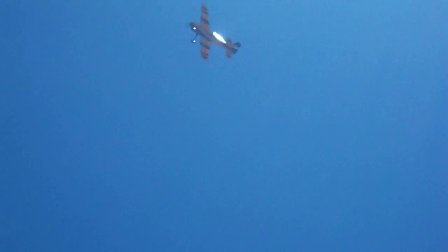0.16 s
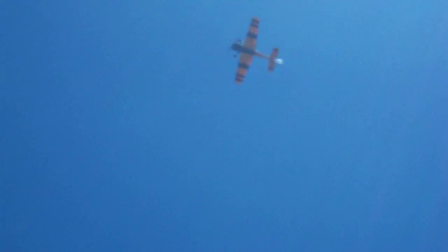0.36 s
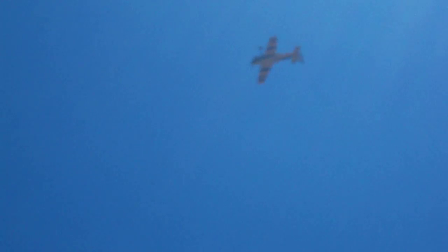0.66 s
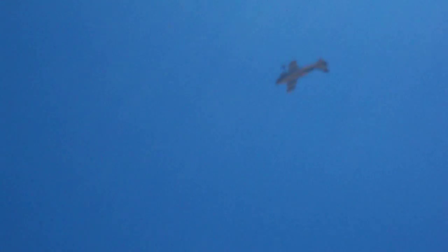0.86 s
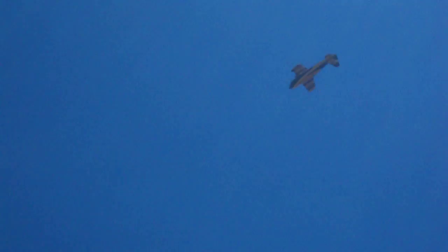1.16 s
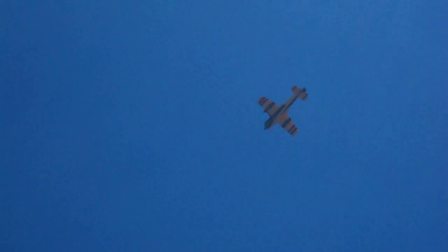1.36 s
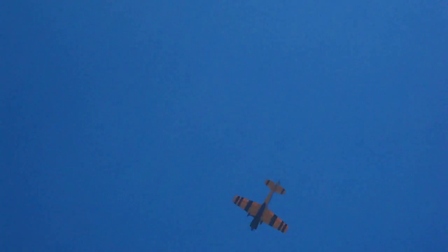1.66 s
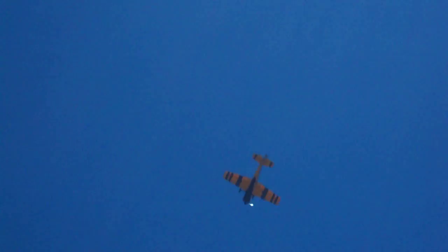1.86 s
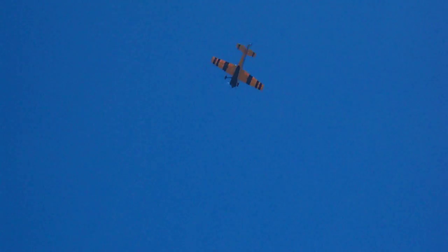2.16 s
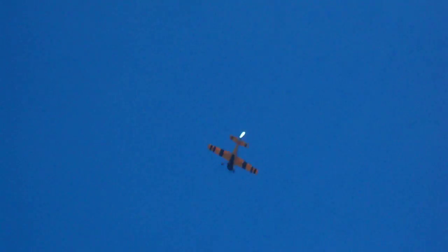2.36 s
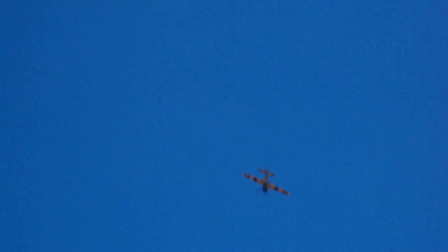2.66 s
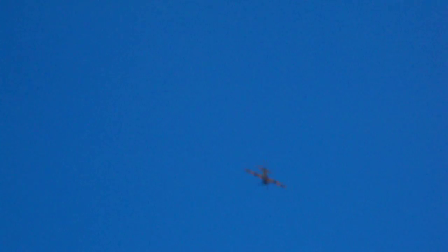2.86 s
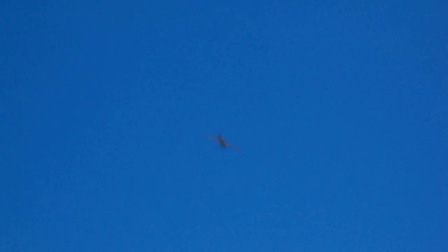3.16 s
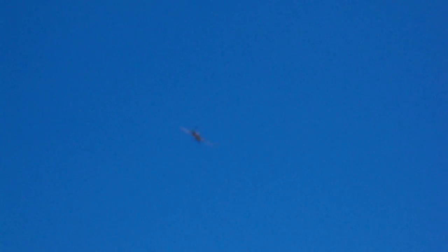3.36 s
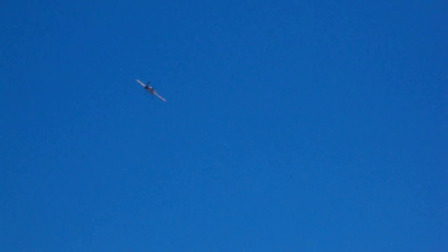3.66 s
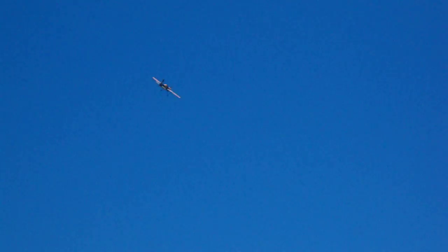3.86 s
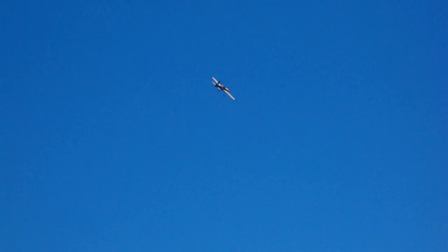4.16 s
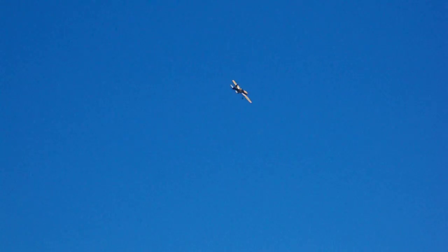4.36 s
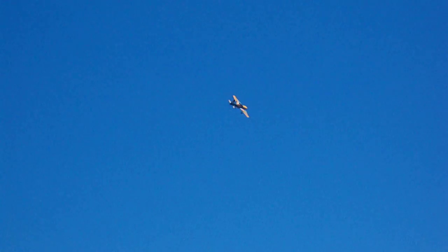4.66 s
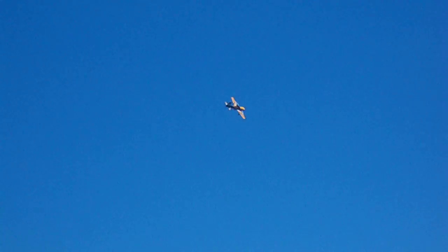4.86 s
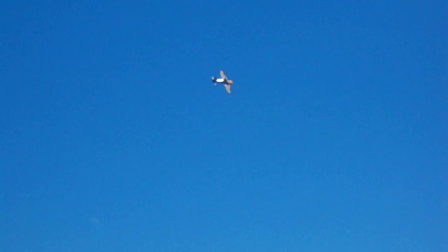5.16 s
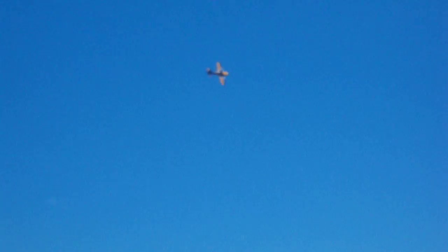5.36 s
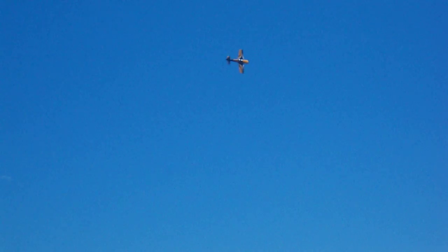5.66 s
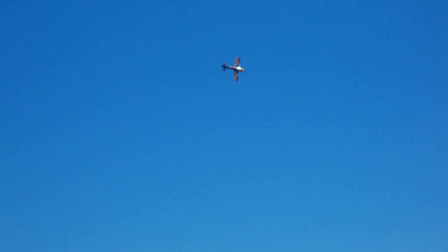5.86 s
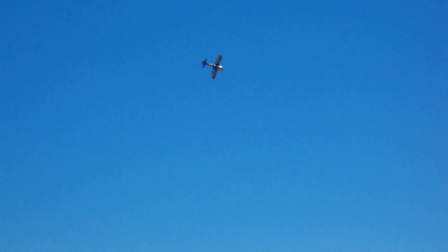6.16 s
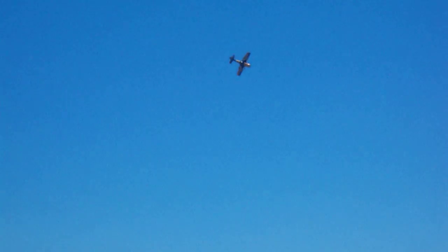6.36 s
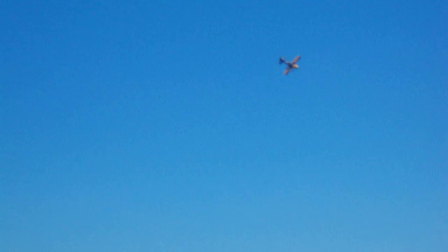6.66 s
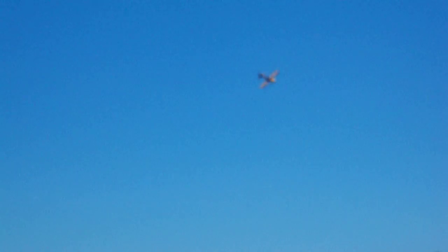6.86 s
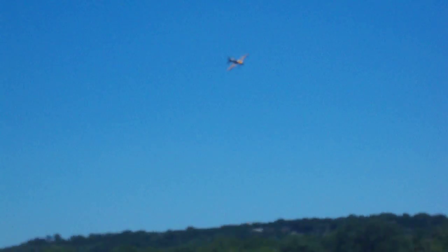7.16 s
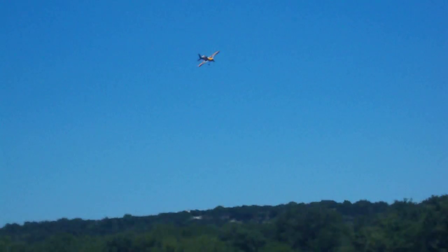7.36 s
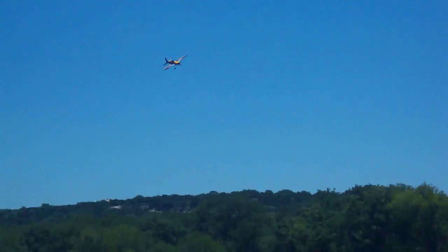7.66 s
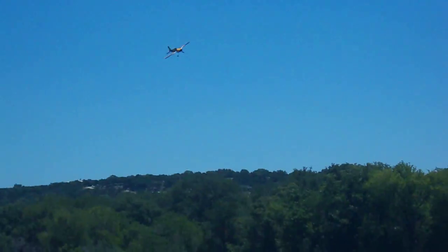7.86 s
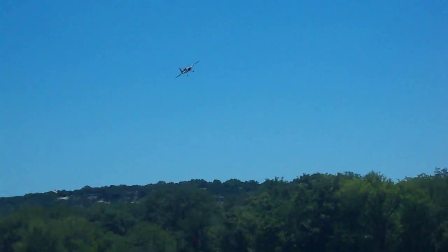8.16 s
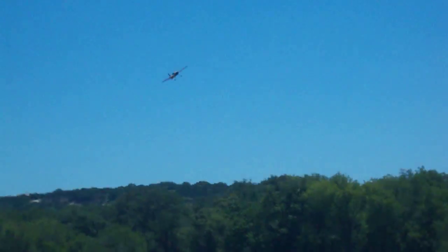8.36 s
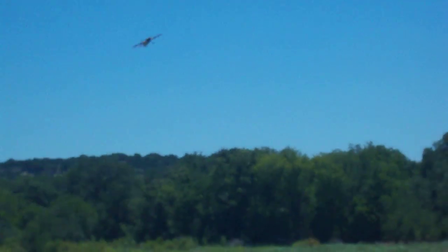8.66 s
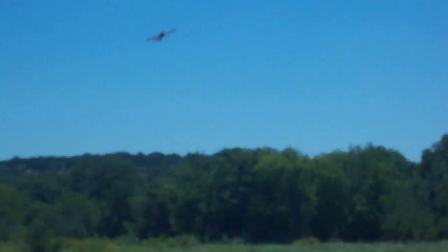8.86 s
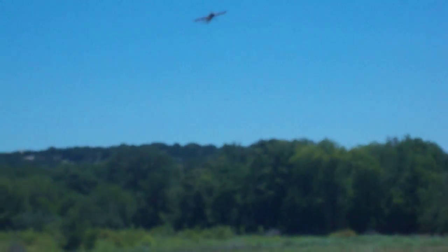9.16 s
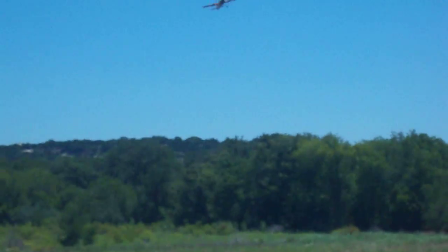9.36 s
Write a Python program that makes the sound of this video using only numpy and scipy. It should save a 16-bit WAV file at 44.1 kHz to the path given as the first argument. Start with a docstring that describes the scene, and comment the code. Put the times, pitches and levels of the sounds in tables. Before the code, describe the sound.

Outdoors, a small two-stroke model plane passes overhead. A very short snarl opens, a few loose pops follow, then a longer burst climbs to a buzzing whine. At about 2.3 seconds the throttle shuts with a faint breathy note, and the engine putters irregularly at idle, growing fainter, then nearer again. Air rushes over the plane, and wind rumbles and buffets the microphone.

```python
"""Two snarling bursts of throttle open the scene: a model plane's two-stroke engine, firing on every turn.
Then it glides at idle, mostly firing every second or third turn: each firing is a pulse that rings the silencer.
The propeller hums on multiples of the shaft speed, and air tears past it as shaped noise.
Grass returns a later, duller copy whose lag mostly shrinks as the plane sinks.
Wind rumbles, pushes and flutters at the microphone, and a few short bright ticks are heard."""
import sys
import numpy as np
from scipy import signal
from scipy.fft import rfft, irfft, next_fast_len
from scipy.io import wavfile
from scipy.ndimage import uniform_filter1d, map_coordinates

SR = 44100
rng = np.random.default_rng(int(sys.argv[2]) if len(sys.argv) > 2 else 0)


def file_out(sig):
    """Save sig as 16-bit WAV at sys.argv[1]."""
    # one column per channel
    cols = np.atleast_2d(sig).T
    # limit, then scale
    lim = np.clip(cols, -1, 1)
    pcm = np.round(lim * 32767).astype(np.int16)
    wavfile.write(sys.argv[1], SR, pcm)


N = 418950

# open throttle, one list per burst: start_s, shaft_hz, firing_db, crack_db (relative to the firing)
POWER_BURSTS = [
    [(0.0, 74.8, -24, 2.5), (0.084, 84.6, -26.5, -1.5), (0.144, 91.1, -22.5, 1), (0.26, 95.2, -27, -18),
     (0.296, 96, -24.5, -37), (0.315, 94.6, -31.5, -27)],
    [(0.721, 55.47, -26.5, 4.5), (0.809, 67.1, -27, -4), (0.845, 71.6, -26.5, -6.5),
     (0.879, 75.16, -25.5, 0.5), (0.937, 79.5, -25, -13), (0.999, 83.9, -29, -1), (1.057, 86, -31, -14),
     (1.131, 88.8, -24.5, 2), (1.411, 89.9, -25, -1), (1.615, 96.13, -24, 1.5), (1.729, 97.3, -26, -2.5),
     (2.005, 98.14, -27, 1), (2.231, 97.6, -29.5, -5.5), (2.312, 95.5, -25.5, -9)],
]
# single firings at idle: start_s, level_db
SINGLE_FIRINGS = [(0.325, -13), (0.357, -12), (0.598, -7), (0.653, -11), (0.709, -9), (2.336, -14),
                  (2.669, -10), (2.788, -16.5), (2.986, -20), (3.105, -21), (3.202, -25.5), (3.257, -22.5),
                  (3.303, -18.5), (3.377, -17), (3.447, -19), (3.519, -22), (3.564, -19.5), (3.634, -20.5),
                  (3.707, -19.5), (3.775, -18.5), (3.846, -23.5), (3.893, -17.5), (3.961, -20),
                  (4.029, -20.5), (4.142, -19.5), (4.188, -25), (4.234, -21.5), (4.3, -23.5), (4.348, -20),
                  (4.39, -25.5), (4.435, -21), (4.481, -27), (4.523, -23.5), (4.568, -24.5), (4.637, -24),
                  (4.722, -26), (4.784, -27), (4.829, -28.5), (4.896, -30.5), (4.957, -24.5), (5.046, -25),
                  (5.134, -25.5), (5.2, -27), (5.265, -25), (5.33, -25.5), (5.396, -31), (5.463, -27),
                  (5.532, -27.5), (5.599, -29.5), (5.688, -33.5), (5.887, -27.5), (5.965, -30),
                  (6.036, -31.5), (6.138, -28.5), (6.24, -28), (6.316, -25), (6.388, -26), (6.457, -24),
                  (6.524, -23.5), (6.593, -23.5), (6.661, -24), (6.707, -25), (6.752, -23), (6.843, -22.5),
                  (6.91, -23), (6.977, -22), (7.065, -22), (7.129, -21), (7.192, -24), (7.234, -20.5),
                  (7.297, -22), (7.342, -24), (7.386, -21.5), (7.452, -19), (7.493, -23), (7.537, -17),
                  (7.601, -23), (7.648, -21), (7.693, -23.5), (7.741, -18), (7.807, -19), (7.875, -20.5),
                  (7.922, -19), (7.967, -25), (8.012, -19.5), (8.099, -20), (8.166, -17), (8.229, -17.5),
                  (8.292, -19.5), (8.354, -18), (8.421, -17), (8.487, -19), (8.549, -18), (8.615, -19.5),
                  (8.682, -18), (8.747, -17), (8.813, -17), (8.859, -25.5), (8.88, -18), (8.945, -17.5),
                  (8.991, -26.5), (9.011, -18), (9.081, -16.5), (9.145, -17), (9.209, -16), (9.271, -15.5),
                  (9.335, -14.5), (9.376, -21.5), (9.42, -14.5), (9.483, -15.5)]
# shaft speed with the throttle closed: start_s, shaft_hz
IDLE_SPEED = [(.3, 42.32), (3.2, 40.2), (3.5, 42.4), (4.5, 45), (5.3, 44.2), (5.9, 42.26), (6.5, 46.04),
              (7.8, 44.5), (8.3, 47.2), (9, 47.8), (9.5, 45.3)]
# mix of the firing colour heard with the exhaust turned aside: start_s, share (0-1)
ASIDE_SHARE = [(.3, 0.75), (.75, 0.92), (1.1, 0.54), (1.4, 0.7), (1.65, 0.47), (2.3, 0.09)]
# boom and bark of a single firing, relative to its level: start_s, boom_db, bark_db
FIRING_BODY = [(.3, -8, -1), (.7, -14, -0.5), (2.4, -6, -1), (3.5, 2, -13), (5.5, 9, -23.5), (6.5, 3.5, -9),
               (7.8, -4, -10.5), (8.8, 2, -1), (9.5, 1, -3.5)]
# crack of a single firing, duller while the plane is far: start_s, crack_db
CRACK_BRIGHTNESS = [(.3, -15), (.6, -6.5), (2.8, -13), (3.3, -9.5), (5, -9), (5.6, -13.5), (6.6, -22),
                    (7.2, -8.5), (7.9, -9.5), (8.5, -12), (9.5, -8.5)]
# notes of the air in the silencer: pitch_hz, level_db, fade_s (time to fall 60 dB)
CHAMBER_NOTES = [(280.5, -2, 0.07), (359, -4.5, 0.047)]
# notes of the silencer walls: pitch_hz, level_db, fade_s (time to fall 60 dB)
WALL_NOTES = [(1797, -6, 0.031), (2555, -7, 0.032), (3460, -14, 0.013), (4870, -21, 0.049),
              (5650, -17, 0.05)]
# motion shifts both sets of silencer notes: start_s, pitch_factor
MOTION_PITCH = [(0, 0.82), (3.5, .93), (6.8, 0.94), (7.5, 0.99), (8.3, 1.0), (9.5, 0.99)]
# level change from the plane's distance and heading: start_s, level_db
NEARNESS = [(0, 9), (.25, 2), (.5, -0.5), (.85, -1.5), (1.2, 3.5), (1.7, 1.5), (2.2, 0), (2.4, -4),
            (2.7, -2.5), (3.15, -5), (3.9, -1), (4.6, -8.5), (5.2, -7), (5.8, -11.5), (6.4, -10.5),
            (7, -6.5), (7.5, -6), (8.2, -5), (8.8, -5), (9.5, -3.5)]
# propeller hum, swelling and fading as the plane rolls: start_s, 2nd_db, 3rd_db, 4th_db, 5th_db
HUM_LEVELS = [(0, -30, -32.5, -39, -45), (.05, -34, -32, -40.5, -42), (.11, -28, -41, -38.5, -60),
              (.2, -29, -37, -56, -47), (.3, -27.5, -41, -45, -61), (.4, -37, -64, -34, -46),
              (.55, -46, -55, -40.5, -47), (.72, -42, -53, -37.5, -32.5), (.84, -50, -34, -44, -39),
              (.95, -56, -33.5, -54, -46), (1.05, -38, -52, -46, -33.5), (1.42, -45.5, -38.5, -51, -40),
              (1.641, -55, -50, -69, -60), (1.97, -49, -33.5, -49, -49), (2.25, -41.5, -35, -42, -42),
              (2.36, -31, -40, -38, -43.5), (2.45, -46, -54, -44, -52), (2.75, -49, -50, -38.5, -43),
              (3.2, -54, -41, -40, -43.5), (5.5, -55, -72, -54, -45.5), (9.5, -55, -70, -48, -45.5)]
# higher hum notes, relative to the 5th: shaft_multiple, level_db
HIGHER_HUM = [(6, -1.5), (7, 1), (8, -7)]
# level of the air hiss: start_s, level_db
HISS_LEVEL = [(0.0, -45), (0.37, -51), (0.61, -49), (0.79, -47.5), (1.48, -45.5), (2.14, -49), (2.3, -47.5),
              (4.15, -54), (4.52, -48), (6.38, -60), (7.49, -50.5), (8.65, -52), (9.21, -46.5), (9.5, -45)]
# breathy note as the throttle closes: start_s, level_db
WHISTLE_LEVEL = [(2.3, -77), (2.45, -51), (2.6, -45.5), (2.75, -74.5)]
# second copy close behind, shifting as the plane turns: start_s, delay_ms, level_db, phase_lag_turns
CLOSE_COPY = [(2.2, 2.2, -18, .5), (3.3, 2.35, -11, .5), (6.5, 2.25, -7, .45), (7.2, 1.88, -5, .48),
              (8, 1.44, -5, .47), (8.5, 1.5, -4, .16), (9.5, 1.5, -4, .16)]
# extra delay of the path over the grass: start_s, delay_ms
GRASS_DELAY = [(0, 8.77), (.8, 9.13), (1.6, 8.03), (2, 7.63), (2.4, 6.44), (2.8, 5.07), (3.4, 4.24),
               (4.2, 3.73), (5.4, 3.33), (7.2, 2.79), (9.5, 2.6)]
# level of the grass copy: start_s, level_db
GRASS_LEVEL = [(0, -4), (.8, -5), (1.3, -8.5), (1.6, -4.5), (2.1, -0.5), (2.8, -7.5), (3.4, -7.5),
               (6, -12.5), (9.5, -14)]
# steady wind at the microphone: start_s, level_db
STEADY_WIND = [(0.0, -36.5), (0.37, -32), (0.66, -24.5), (1.82, -31), (2.7, -18.5), (3.12, -25),
               (3.41, -18.5), (3.89, -25.5), (4.34, -16), (5.72, -32), (5.92, -28.5), (6.27, -35),
               (6.98, -28), (7.67, -27), (8.04, -32), (8.39, -26.5), (8.99, -32), (9.5, -33)]
# separate buffets: start_s (middle of the buffet), level_db, length_s
WIND_BUFFETS = [(0.513, -13.5, 0.057), (0.651, -7.5, 0.021), (0.81, -16.5, 0.011), (0.864, -16.5, 0.017),
                (0.955, -10.5, 0.019), (0.991, -16, 0.022), (2.557, -16, 0.049), (2.663, -10, 0.012),
                (2.844, -9.5, 0.007), (2.903, -7, 0.02), (2.951, -13, 0.0064), (3.046, -2.5, 0.018),
                (3.084, -7.5, 0.012), (3.228, -8.5, .007), (3.271, -9.5, 0.011), (3.432, -8, 0.02),
                (3.475, -13, 0.0033), (3.592, -11, 0.0165), (4.074, -7.5, 0.0095), (4.271, -3, 0.0083),
                (4.346, -7, 0.0038), (4.421, -14, 0.043), (4.547, -5, 0.034), (4.671, -18, 0.019),
                (4.805, -8, 0.023), (5.143, -15.5, 0.019), (5.416, -13.5, 0.019), (5.609, -10, 0.013),
                (7.279, -21, 0.022), (7.376, -12, 0.0064), (7.576, -10, 0.016), (8.389, -14, 0.019),
                (9.49, -13, 0.017)]
# dry ticks: start_s, level_db
TICK_TIMES = [(4.809, -36.5), (7.58, -43.5), (8.581, -38)]

# Colours: relative strength at each pitch; columns pitch_hz, level_db (per Hz).
# regular firing
BARK_COLOUR = [(60, -17), (190, -8.5), (290, -1), (390, -32), (480, -2.5), (700, -1), (1130, 4),
               (1400, -8.5), (2000, -5.5), (2350, -24.5), (2650, -5.5), (3200, -10), (4000, -19),
               (4500, -36), (5500, -23), (8000, -28.5), (9000, -59)]
# firing with the exhaust turned aside
ASIDE_COLOUR = [(60, -16.5), (190, -1), (290, 0), (390, -5.5), (480, 6.5), (700, 0.5), (800, 0),
                (1050, 1.5), (1200, -12), (1340, -2.5), (1600, -16.5), (2000, -10.5), (2350, -25.5),
                (2700, -15.5), (3500, -20), (4200, -28), (8000, -26), (9000, -54.5)]
# low thump of a single firing
THUMP_COLOUR = [(60, -26.5), (130, -7.5), (270, 8), (420, 0.5), (650, -3.5), (1050, -12.5), (1400, -24.5),
                (2000, -15), (3000, -28), (9000, -49)]
# sharp crack of a firing
CRACK_COLOUR = [(700, -28.5), (1500, -5.5), (2000, -0.5), (2400, 3.5), (3100, 0.5), (4000, -2), (5500, -4),
                (7300, -4.5), (8800, -37.5)]
# gas pushed out without fire
PUFF_COLOUR = [(80, -21.5), (180, -4), (280, 15), (390, -4.5), (600, -10), (1000, -19), (1700, -32.5),
               (3000, -30), (9000, -72)]
# air tearing past the plane
RUSH_COLOUR = [(150, -47), (300, -3), (450, 4), (700, 0.5), (1200, -3), (2000, -6.5), (3000, -12.5),
               (4200, -21.5), (9000, -56.5)]
# highest part of air and firings
HISS_COLOUR = [(2500, 5.5), (4000, 4), (5500, 3.5), (7300, 2), (8200, -6), (8900, -48.5)]
# deep wind rumble
RUMBLE_COLOUR = [(8, -37.5), (20, 0.5), (38, 3.5), (70, -2), (110, -11.5), (200, -24.5), (600, -85.5)]
# higher wind flutter
FLUTTER_COLOUR = [(50, -0.5), (100, -3), (170, -8), (280, -14.5), (400, -22), (1000, -71)]

IDLE_HZ = 42.2  # reference shaft speed
RUN_DOWN_S = .22  # time constant of the fall towards idle
PUFF_DB = -36
BLADE_TURNS = 0.2897  # where the blades stand when the port opens
RUSH_DB, RUSH_PER_OCTAVE_DB = -41.5, 5  # at the reference speed, and per doubling of it
EDDY_HZ, EDDY_S = 30.6, 0.028  # typical pitch of a push of this length; shorter is higher
FLUTTER_DB = -11  # relative to the wind
TOP_HZ = 8985


def amp(db):
    """Turn decibels into gain."""
    return 10 ** (np.asarray(db) / 20)


def unit(x):
    """Scale x to rms 1."""
    return x / np.sqrt(np.mean(x ** 2) + 1e-20)


def along(points, hz):
    """Read a colour's dB between its points on a log pitch axis."""
    f, db = np.transpose(points)
    return np.interp(np.log(hz + 1), np.log(f + 1), db)


def curves(rows):
    """Give one value per sample for each column after the time."""
    s, *columns = np.transpose(rows)
    return [np.interp(np.arange(N) / SR, s, column) for column in columns]


def wobble(rate):
    """Draw a smooth random curve with this many random points a second."""
    points = rng.standard_normal(int(N * rate / SR) + 4)
    return map_coordinates(points, [np.arange(N) * rate / SR])


def filtered(x, response):
    """Multiply the spectrum of x by a response of frequency."""
    size = next_fast_len(N + SR // 2)
    return irfft(rfft(x, size) * response(np.fft.rfftfreq(size, 1 / SR)), size)[:N]


def noise(colour):
    """Make coloured noise of rms 1."""
    return unit(filtered(rng.standard_normal(N), lambda hz: amp(along(colour, hz))))


def ring(x, colour, lead=0):
    """Give pulses a colour at energy 1; lead (turns) bends a push into a push and pull."""
    size = 2 ** 12
    # folding the cepstrum makes the response begin promptly
    cepstrum = irfft(np.log(amp(along(colour, np.fft.rfftfreq(size, 1 / SR)))))
    cepstrum[1:size // 2] *= 2
    cepstrum[size // 2 + 1:] = 0
    response = np.exp(rfft(cepstrum) + 2j * np.pi * lead)
    shape = np.roll(irfft(response), size // 2)
    return signal.fftconvolve(x, shape / np.linalg.norm(shape))[size // 2:][:N]


def spikes(s, db):
    """Place an impulse at each time, shared between the two nearest samples."""
    at = np.clip(s * SR, 0, N - 2)
    left = at.astype(int)
    share = at - left
    return np.bincount(left, amp(db) * (1 - share), N) + np.bincount(left + 1, amp(db) * share, N)


def bursts(s, db, t60):
    """Place a short dying burst of white noise at each time."""
    t = np.arange(SR // 20) / SR
    fall = amp(-60 * t / t60)
    envelope = signal.fftconvolve(spikes(s, db), fall / np.linalg.norm(fall))[:N]
    return envelope * rng.standard_normal(N)


def ringing(s, db, modes, scatter_db=4.5):
    """Each pulse rings the silencer's dying notes at new random strengths, shifted by motion."""
    t = np.arange(SR // 10) / SR
    hz, level_db, t60 = np.transpose(modes)[:, :, None, None]
    detune = 1 + .015 * rng.standard_normal((len(s), 1))
    shift = np.interp(s, *np.transpose(MOTION_PITCH))[:, None] * detune
    chance = rng.standard_normal((len(s), len(modes))).T[:, :, None]
    fading_db = level_db + db[:, None] + scatter_db * chance - 60 * t / t60
    notes = amp(fading_db) * np.sin(2 * np.pi * hz * shift * t)
    where = np.round(s * SR).astype(int)[:, None] + np.arange(len(t))
    return np.bincount(where.ravel(), notes.sum(axis=0).ravel(), N + SR)[:N]


def exhaust(angle):
    """The piston opens the exhaust port once a turn, with or without fire."""
    s = np.interp(np.arange(angle[-1]), angle, np.arange(N) / SR)
    powered = np.any([(s > burst[0][0] + .004) & (s < burst[-1][0]) for burst in POWER_BURSTS], axis=0)
    gap_s = np.abs(s[:, None] - np.transpose(SINGLE_FIRINGS)[0]).min(axis=1)
    unfired = ~powered & (gap_s > .006)
    return throttle(s[powered]) + pops() + puffs(s[unfired] + 0.00153)


def throttle(s):
    """Regular firings each push out a clean pulse, with a spit of noise from the gas jet."""
    chance = rng.standard_normal((len(s), 3))
    s = s + .0018 + 3e-6 * chance[:, 0]
    rows = POWER_BURSTS[0] + POWER_BURSTS[1]
    at, _, _, crack_db = np.transpose(rows)
    db = per_turn(s, rows) + .4 * chance[:, 1]
    spit_db = db + np.interp(s, at, crack_db) + chance[:, 2]
    jet = ring(bursts(s, spit_db - 16, t60=.006), CRACK_COLOUR)
    aside = np.clip(curves(ASIDE_SHARE)[0], 0, 1)
    train = spikes(s, db)
    facing = ring(train * (1 - aside), BARK_COLOUR, lead=1 / 5)
    turned = ring(train * aside, ASIDE_COLOUR, lead=1 / 5)
    return facing + turned + jet


def per_turn(s, rows):
    """Find one pulse's energy by sharing the level of the whole train among its turns."""
    at, hz, db = np.transpose(rows)[:3]
    return np.interp(s, at, db - 10 * np.log10(hz / SR))


def pops():
    """Single idle firings thump and ring the air in the silencer, then crack and ring its walls."""
    s, db = np.transpose(SINGLE_FIRINGS)
    s = s + .0022
    at, boom, bark = np.transpose(FIRING_BODY)
    boom_db = db + np.interp(s, at, boom)
    bark_db = db + np.interp(s, at, bark)
    push = spikes(s, (db + boom_db) / 2 + 17.0) + bursts(s, boom_db + 6.5, t60=0.048)
    thump = ring(push, THUMP_COLOUR)
    thump = thump + ringing(s, boom_db - 7.0, CHAMBER_NOTES, scatter_db=2.5)
    thump = thump + ring(spikes(s, bark_db + 14.0), ASIDE_COLOUR, lead=1 / 6)
    snap_db = db + np.interp(s, *np.transpose(CRACK_BRIGHTNESS))
    snap = spikes(s, snap_db + 14.0) + bursts(s, snap_db + 15.5, t60=0.01)
    crack = ring(snap, CRACK_COLOUR)
    body = filtered(thump + crack, lambda hz: 1 / (1 + (hz / 3800) ** 4))
    # the sizzle differs from firing to firing
    sizzle_db = snap_db + 5 + 3.5 * rng.standard_normal(len(s))
    sizzle = ring(bursts(s, sizzle_db, t60=.03), HISS_COLOUR)
    wall_db = snap_db + .5 * (boom_db - db) - 3.0
    return body + sizzle + ringing(s, wall_db, WALL_NOTES, scatter_db=3.5)


def puffs(s):
    """A turn without fire pushes a little gas through the silencer and unevenly ticks its walls."""
    db = PUFF_DB + np.interp(s, *np.transpose(NEARNESS)) + 10 * np.log10(SR / IDLE_HZ)
    db = db + 1.2 * rng.standard_normal(len(s))
    db = db + .5 * np.interp(s, *np.transpose(FIRING_BODY)[:2])  # fuller when the chamber booms
    gas = spikes(s, db - 1.5) + bursts(s, db - 10, t60=.045)
    chamber = ringing(s, db - 30.5, CHAMBER_NOTES, scatter_db=0.5)
    wall_db = db - 47.5 + 2.4 * rng.exponential(size=len(s))
    return ring(gas, PUFF_COLOUR) + chamber + ringing(s, wall_db, WALL_NOTES)


def shaft():
    """Add up the turns of the crankshaft, nudged so every single firing falls on a whole turn."""
    angle = np.cumsum(speed()) / SR
    t, fired = np.arange(N) / SR, np.transpose(SINGLE_FIRINGS)[0]
    at = np.interp(fired, t, angle)
    whole_turns = np.cumsum(np.maximum(np.round(np.diff(at, prepend=0)), 1))
    slip = whole_turns - at
    start, end = POWER_BURSTS[1][0][0], POWER_BURSTS[1][-1][0]
    held = np.where((t > start) & (t < end), start, t)  # hold the nudge through the second burst
    return angle + uniform_filter1d(np.interp(held, fired, slip), size=900)


def speed():
    """Shaft speed in Hz follows the open throttle, then sinks to idle after it shuts."""
    t = np.arange(N) / SR
    idle = hz = curves(IDLE_SPEED)[0]
    for burst in POWER_BURSTS:
        s, driven = np.transpose(burst)[:2]
        fall = np.exp(-np.maximum(t - s[-1], 0) / RUN_DOWN_S)
        falling = idle + (driven[-1] - idle) * fall
        after_start = np.where(t < s[-1], np.interp(t, s, driven), falling)
        hz = np.where(t < s[0], hz, after_start)
    return hz


def propeller(angle):
    """The blades hum as sine waves on multiples of the shaft speed."""
    levels = list(zip((2, 3, 4, 5), curves(HUM_LEVELS)))
    fifth_db = levels[-1][1]
    levels += [(k, fifth_db + db - 3 * np.log2(speed() / IDLE_HZ)) for k, db in HIGHER_HUM]
    turned = 2 * np.pi * (angle - BLADE_TURNS)
    return np.sqrt(2) * sum(amp(db + 1.1 * wobble(13)) * np.sin(k * turned) for k, db in levels)


def airflow(angle):
    """Air tears unsteadily over propeller and wings, as noise swelling once a turn."""
    beat_db = 1.03 * np.cos(2 * np.pi * (angle - .2))
    rush_db = heard(RUSH_DB, RUSH_PER_OCTAVE_DB) + beat_db + 1.1 * wobble(25) + .9 * wobble(4.6)
    rush = amp(rush_db) * noise(RUSH_COLOUR)
    t = np.arange(N) / SR
    powered = sum(1. * (t >= b[0][0]) * (t < b[-1][0]) for b in POWER_BURSTS)
    thinned = .55 * uniform_filter1d(powered, size=900)  # less low rush under power
    rush = rush - thinned * filtered(rush, lambda hz: 1 / (1 + (hz / 1500) ** 4))
    hiss_db = curves(HISS_LEVEL)[0] + beat_db + 1.95 * wobble(30) + .7 * wobble(1.9)
    return rush + amp(hiss_db) * noise(HISS_COLOUR)


def heard(idle_db, per_octave_db):
    """Set the level of a sound that grows with shaft speed and follows distance and heading."""
    return idle_db + per_octave_db * np.log2(speed() / IDLE_HZ) + curves(NEARNESS)[0]


def whistle():
    """A narrow band of noise makes a breathy note while the engine runs down."""
    colour = [(1200, -56.0), (1500, 3.0), (1580, 1.5), (1700, -5.5), (2200, -35.5)]
    return amp(curves(WHISTLE_LEVEL)[0]) * noise(colour)


def echo(x, delay_ms, db, lag=0, dull_hz=1200, thin_hz=0):
    """A duller copy arrives later; a soft surface turns its phase, a small one returns no bass."""
    def dull(hz):
        """Weaken the treble, and the bass below thin_hz."""
        return 1 / (1 + (hz / dull_hz) ** 2) / (1 + (thin_hz / (hz + 1)) ** 4)

    where = [np.arange(N) - delay_ms * SR / 1000]
    plain = map_coordinates(filtered(x, dull), where, order=1)
    quarter = map_coordinates(filtered(x, lambda hz: -1j * dull(hz)), where, order=1)  # a quarter turn late
    return amp(db) * (np.cos(2 * np.pi * lag) * plain + np.sin(2 * np.pi * lag) * quarter)


def ticks():
    """Short bursts of bright noise make dry ticks."""
    s, db = np.transpose(TICK_TIMES)
    return ring(bursts(s, db + 25, t60=0.014), CRACK_COLOUR)


def wind():
    """Air rumbles unevenly, eddies push the microphone briefly, and stronger wind flutters more."""
    s, db, length = np.transpose(WIND_BUFFETS)[:, :, None]
    chance = rng.standard_normal((len(s), 2))
    offset = np.arange(-SR // 8, SR // 8)
    t = offset / SR
    where = np.clip(np.round(s * SR).astype(int) + offset, 0, N).ravel()
    swells = amp(db) * np.exp(-(t / length) ** 2)
    eddy_hz = EDDY_HZ * (EDDY_S / length) ** 0.66 * amp(chance[:, :1])
    pushes = swells * np.cos(2 * np.pi * eddy_hz * t + 3 * chance[:, 1:])
    swell = np.bincount(where, swells.ravel(), N + 1)[:N]
    push = np.bincount(where, pushes.ravel(), N + 1)[:N]
    steady = amp(curves(STEADY_WIND)[0])
    rumble = unit(amp(3.5 * wobble(11)) * noise(RUMBLE_COLOUR))
    flutter = unit(amp(3.7 * wobble(22)) * noise(FLUTTER_COLOUR))
    flutter_level = amp(FLUTTER_DB) * (0.59 * steady + 1.07 * swell)
    return steady * rumble + 0.75 * push + flutter_level * flutter


def scene():
    """The plane is heard directly and off the grass, with ticks and wind at the microphone."""
    angle = shaft()
    plane = exhaust(angle) + propeller(angle) + airflow(angle) + whistle()
    plane = plane + echo(plane, *curves(CLOSE_COPY), dull_hz=4000, thin_hz=450)
    grass = echo(plane, *curves(GRASS_DELAY), *curves(GRASS_LEVEL))
    return (plane + grass + wind() + ticks())[None]


def record(dry):
    """The band limit removes everything from TOP_HZ up."""
    return filtered(dry[0], lambda hz: hz < TOP_HZ)[None]


dry = scene()
out = record(dry)
file_out(out)
```